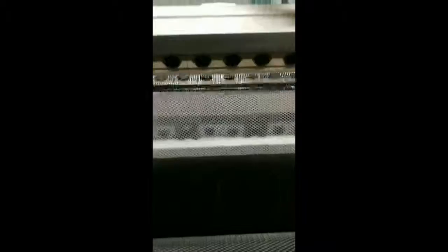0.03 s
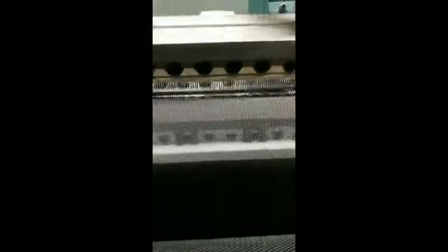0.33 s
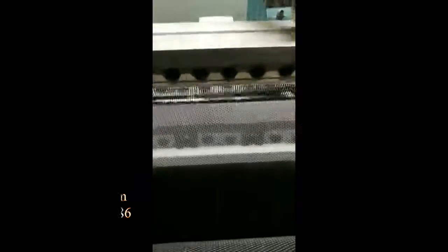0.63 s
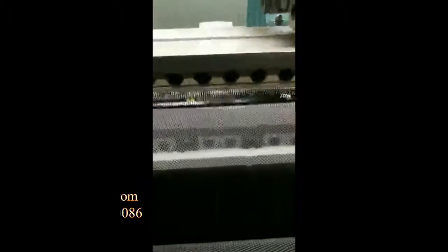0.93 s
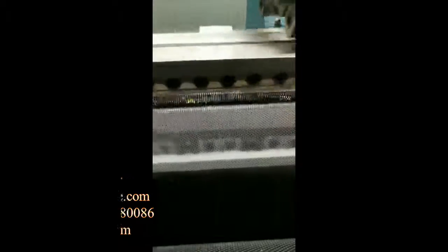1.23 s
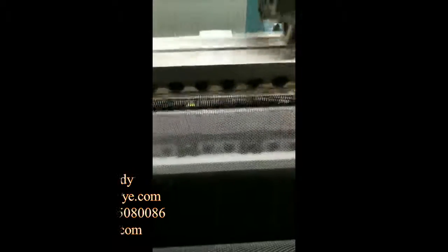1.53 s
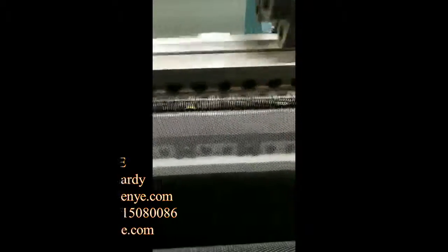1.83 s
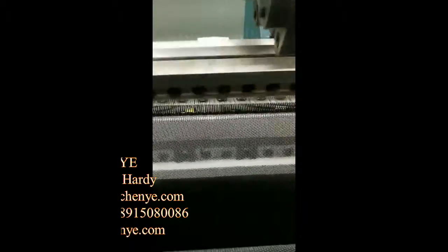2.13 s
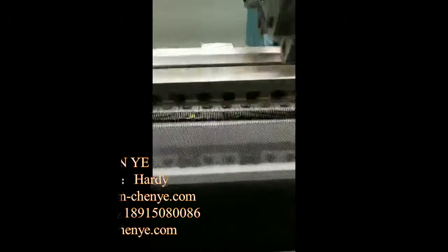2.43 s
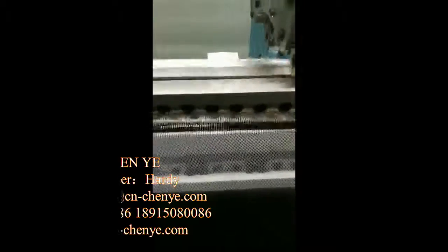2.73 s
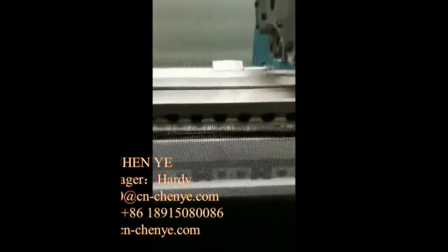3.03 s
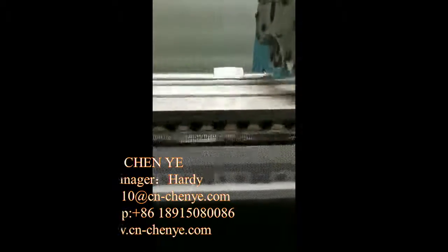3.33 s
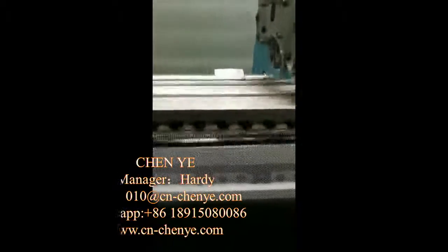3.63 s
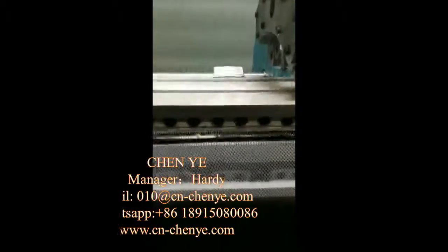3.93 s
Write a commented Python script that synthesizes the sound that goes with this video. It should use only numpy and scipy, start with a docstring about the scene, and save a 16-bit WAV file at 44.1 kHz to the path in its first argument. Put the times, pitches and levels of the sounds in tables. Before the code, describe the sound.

A factory knitting machine runs at steady speed close to the microphone. Needles clatter and bars thump in quick, even strokes over a drone and light yarn hiss. A metallic ringing builds early, then the level eases slightly.

```python
"""Factory hall, close up on a warp knitting machine at steady speed; a phone's two microphones.
The sound cuts in at 0.26 s. Each turn of the main shaft repeats the stroke: the swinging bars thump and
knock, needles clatter, yarn hisses through the guides; the frame drones, gears sing, the drive whines.
By 1 s the clang of the needle bars has come up. By 1.8 s the level has eased and the clatter surges
less; the machine runs on to the end."""
import sys
import numpy as np
from scipy import signal
from scipy.fft import rfft, irfft
from scipy.io import wavfile
from scipy.ndimage import map_coordinates

SR = 44100
rng = np.random.default_rng(int(sys.argv[2]) if len(sys.argv) > 2 else 0)


def store_pcm(level_fs):
    """Save levels as 16-bit WAV."""
    pcm = np.round(np.clip(level_fs, -1, 1) * 32767).astype(np.int16)
    wavfile.write(sys.argv[1], SR, np.atleast_2d(pcm).T)


N = 176400

TURN_HZ, GRAIN_HZ = 6.376, 700.4  # main shaft; fine flicker of clatter and hiss


def undb(db):
    return 10 ** (np.asarray(db) / 20)


def across(table, hz):
    """Read a (Hz, value) table on a log-frequency axis."""
    f, v = np.array(table, float).T
    return np.interp(np.log(np.maximum(hz, 1)), np.log(f), v)


def colour(x, gain):
    """Filter by a gain given as a function of frequency."""
    return irfft(rfft(x) * gain(np.fft.rfftfreq(N, 1 / SR)), N)


def shaped(x, spectrum, db):
    """Give a sound a spectrum and an rms level."""
    y = colour(x, lambda f: undb(across(spectrum, f)))
    return y * undb(db) / np.std(y)


def walk(rate):
    """Smooth chance with a spread near 1."""
    points = rng.standard_normal(int(N / SR * rate) + 4)
    return map_coordinates(points, [np.arange(N) / SR * rate], order=2, mode="mirror")


def over_time(t, table):
    return np.interp(t, *np.array(table).T)


def each_turn(t, table):
    """Gain that follows the same (ms, dB) course in every turn."""
    ms, db = np.array(table, float).T
    return undb(np.interp(t, ms / 1000, db, period=1 / TURN_HZ))


def rattle(repeat):
    """Dense contacts: a share recurs alike in every turn, the rest is new."""
    size = round(SR / TURN_HZ)
    turn = irfft(np.exp(2j * np.pi * rng.random(size // 2 + 1)), size)
    recurring = np.resize(turn / turn.std(), N)
    return np.sqrt(repeat) * recurring + np.sqrt(1 - repeat) * rng.standard_normal(N)


def shaft_tones(t, table):
    """Steady tones on whole multiples of the shaft rate."""
    return sum(np.sqrt(2) * undb(db) * np.sin(2 * np.pi * (order * TURN_HZ * t + rng.random()))
               for order, db in table)


def reflected(t, x, t60_s=.11, db=-5.5):
    """Add short, dense reflections off the machine's steel sides."""
    tail = rng.standard_normal(N) * np.exp(-np.log(1000) * t / t60_s)
    return x + undb(db) * signal.fftconvolve(x, tail / np.linalg.norm(tail))[:N]


def ringing(x, modes, db, top_hz=5800):
    """Steel ringing on its modes, at an rms level."""
    def response(f):
        peaks = sum(undb(gain) * width / (1j * width + 2 * (hz - f)) for hz, width, gain in modes)
        return peaks / (1 + (f / top_hz) ** 8)
    y = colour(x, response)
    return y * undb(db) / y.std()


def stroke(t, ms, jitter_s=.000097, scatter_db=.87):
    """Time from the nearest blow of a kind (s) and its strength; both vary from turn to turn."""
    since = t - ms / 1000 + 1 / TURN_HZ
    turn = np.maximum(np.round(since * TURN_HZ), 0).astype(int)
    size, shift = rng.standard_normal((turn[-1] + 1, 2)).T
    return since - turn / TURN_HZ + jitter_s * shift[turn], undb(scatter_db * size)[turn]


# Motor drive, faint behind the machine: tones (f/Hz, level/dB) and their course (t/s, level/dB)
WHINE_TONES = [(11649, -77), (11946, -70), (11999, -74), (12059, -70), (12295, -72)]
WHINE_COURSE = [(.26, 5), (.55, 5), (.9, 0), (1.25, -3), (1.6, 2.5), (2.9, .5), (3.25, 4.5), (4, 2.5)]
def whine(t, waver_db=2.5):
    """The drive's switching tone and its sidebands, each wavering."""
    tones = sum(undb(db + waver_db * walk(2.85)) * np.sin(2 * np.pi * hz * t + .5 * walk(12))
                for hz, db in WHINE_TONES)
    return tones * undb(over_time(t, WHINE_COURSE))


# Gear tones (f/shaft rate, level/dB)
GEAR_ORDERS = [(100, -51), (146, -53.8), (162, -53.2), (166, -51.4), (167, -53.9), (184, -47.5),
               (240, -54.9), (241, -55.5), (255, -54.9), (259, -55.6), (266, -55.7), (271, -55.9)]
def gears(t):
    """The gears sing on high shaft orders."""
    return shaft_tones(t, GEAR_ORDERS)


# Drone of the frame (f/shaft rate, level/dB)
FRAME_ORDERS = [(10, -55), (11, -57), (14, -55), (15, -56), (16, -46.5), (19, -58), (24, -53), (26, -53),
                (33, -50), (34, -47), (43, -44), (52, -53), (56, -51), (58, -51)]
def frame_drone(t):
    """The frame drones on low shaft orders."""
    return shaft_tones(t, FRAME_ORDERS)


# Yarn hiss: spectrum (f/Hz, level/dB) and course in the turn (t/ms, level/dB)
YARN_SPECTRUM = [(1500, 0), (3500, -0.5), (5000, 2), (6200, -1), (8500, -1), (10800, -5), (13300, -3),
                 (15800, -15.5)]
YARN_IN_TURN = [(0, -4), (15, -4.5), (40, -7.5), (58, -4.5), (63, 2.5), (85, 2), (105, 0.5), (125, -2),
                (141, -8), (145, 4.5), (150, -3)]
def yarn(t, grain_db=.7):
    """Yarn hisses as each stroke draws it through the guides."""
    friction = rng.standard_normal(N) * each_turn(t, YARN_IN_TURN) * undb(grain_db * walk(GRAIN_HZ))
    return shaped(reflected(t, friction), YARN_SPECTRUM, db=-46)


# Needle bars: modes (f/Hz, width/Hz, level/dB), drive in the turn (t/ms, level/dB),
# course (t/s, level/dB)
CLANG_MODES = [(1550, 24, -2), (1625, 54, 1), (1693, 23, 1.5), (1766, 30, -2.5), (1893, 34, -3.5),
               (2940, 40, -5.5), (3014, 42, -5.5)]
CLANG_IN_TURN = [(0, -2), (12, 5), (24, 0.5), (34, -6), (45, 2.5), (54, -7), (95, -7), (112, 0.5),
                 (123, -7), (132, 7), (143, -5.5), (152, 1.5)]
CLANG_COURSE = [(.26, -10), (1, -0.5), (1.6, -0.5), (2.3, -0.5), (3.1, 0.5), (4, 0.5)]
def bar_clang(t):
    """Contacts set the needle bars ringing several times a turn."""
    contacts = rattle(repeat=.55) * each_turn(t, CLANG_IN_TURN)
    return ringing(contacts, CLANG_MODES, db=-38.3) * undb(over_time(t, CLANG_COURSE))


# Bar rumble: spectrum (f/Hz, level/dB) and course in the turn (t/ms, level/dB)
RUMBLE_SPECTRUM = [(25, -48), (60, -11), (120, -9.5), (160, -3), (215, -1), (285, -5), (365, -1),
                   (450, -4.5), (650, -6), (850, -11), (1200, -18), (2500, -45)]
RUMBLE_IN_TURN = [(0, 1), (25, 1), (42, 0), (52, 2), (75, 3.5), (86, -5), (105, 1), (130, -7.5), (150, 1.5)]
def bar_rumble(t):
    """The bars rumble as they swing."""
    return shaped(rattle(repeat=.5) * each_turn(t, RUMBLE_IN_TURN), RUMBLE_SPECTRUM, db=-36)


# Needle clatter: spectrum (f/Hz, level/dB), surge in the turn (t/ms, level/dB),
# depth of the surge (t/s, factor on its dB swing)
CLATTER_SPECTRUM = [(300, -9.5), (600, -8), (850, -5), (1060, -4.5), (1200, -1), (1380, -4.5), (1650, -3.5),
                    (1900, -3.5), (2250, -4), (2600, -4.5), (2950, -6), (3200, -11.5), (3550, -10.5),
                    (3850, -14.5), (5100, -18), (5900, -25), (9000, -39), (16000, -46)]
SURGE_IN_TURN = [(0, 0.06), (16, 1.34), (30, 0.93), (47, -0.51), (60, -2.3), (80, -1), (95, -0.45),
                 (122, 0.36), (140, -0.64)]
SURGE_DEPTH = [(.26, 1.7), (1.3, 1.5), (1.8, 1), (4, 1)]
# Modes of the guides and steel plates (f/Hz, width/Hz, level/dB)
PLATE_MODES = [(1068, 14.5, 1.5), (1175, 7.9, -0.5), (1460, 10, -4), (2760, 12, -4), (2937, 26, -3.5),
               (3507, 60, -11.5), (5100, 51, -14)]
def needle_clatter(t, grain, grain_db=1.5):
    """Needles and sinkers clatter in surges; guides and plates ring thinly with them."""
    surge = each_turn(t, SURGE_IN_TURN) ** over_time(t, SURGE_DEPTH)
    contacts = rattle(repeat=.4) * surge * undb(grain_db * grain)
    needles = shaped(reflected(t, contacts), CLATTER_SPECTRUM, db=-34)
    return needles + ringing(contacts * surge, PLATE_MODES, db=-44.5)


# Needle clacks in each turn (t/ms, f/Hz, level/dB)
NEEDLE_CLACKS = [(10.8, 1560, -39.5), (14.5, 2640, -34), (16.9, 1130, -34.5), (24.9, 1200, -37.5),
                 (39.8, 1100, -36), (38.3, 2540, -34.5), (42.9, 1400, -35.5), (44.4, 1280, -37.5),
                 (47.5, 2480, -39), (51.2, 1950, -34), (59.5, 2640, -41), (68.5, 2600, -38.5),
                 (94.5, 960, -31.5), (112.5, 1080, -44), (130.8, 1740, -42.5), (134.2, 1800, -36),
                 (153.1, 1600, -39.5), (152, 3000, -41.5)]
def clacks(t, swell_s=.0015, width_hz=450):
    """Rows of needles and sinkers meet: short, unpitched bursts of contacts."""
    out, contacts = np.zeros(N), rattle(repeat=.39)
    for ms, hz, db in NEEDLE_CLACKS:
        age, size = stroke(t, ms)
        rise = np.maximum(age, 0) / swell_s
        burst = colour(contacts, lambda f: np.exp(-((f - hz) / width_hz) ** 2))
        out += undb(db) * size * rise * np.exp(1 - rise) * burst / burst.std()
    return out


def thud(t, ms, hz, db, half_ms):
    """A heavily damped blow in every turn."""
    age, size = stroke(t, ms)
    return -undb(db) * size * np.exp(-(age * 1000 / half_ms) ** 2) * np.cos(2 * np.pi * hz * age)


# Bar thumps in each turn, close to the microphones (t/ms, f/Hz, level/dB)
BAR_THUMPS = [(7.15, 284, -31), (15.92, 323, -32), (25.08, 255, -28), (37, 315, -31), (42.74, 344, -32),
              (54.6, 235, -30), (62.24, 337, -32.5), (73.5, 253, -29), (84.74, 307, -28.5),
              (105.6, 243, -29), (145.8, 207, -30), (152.5, 252, -26)]
def bars(t):
    """The swinging bars thump along the stroke and land with one firm knock."""
    thumps = sum(thud(t, ms, hz, db, half_ms=4.14) for ms, hz, db in BAR_THUMPS)
    return thumps + thud(t, ms=31.6, hz=575, db=-20, half_ms=1.9)


# Microphone pair: left over right (f/Hz, level/dB) and likeness (f/Hz, coherence 0-1)
MIC_SHADOW = [(60, 0), (200, 0.6), (370, 1.9), (500, 6.1), (700, 7.2), (1290, 6.8), (2380, 8.47),
              (4400, 11.5), (6000, 18), (8120, 22), (12000, 29), (15000, 30)]
MIC_LIKENESS = [(60, 1), (130, 0.98), (290, 0.78), (450, 1), (700, 0.36), (1200, 0.088), (3000, 0.1),
                (16000, 0.0975)]
def microphones(shared, near, far, lag_s=.000574):
    """The bass reaches both alike; the right one hears later and is turned away from the treble."""
    def likeness(f):
        return across(MIC_LIKENESS, f)
    def ports(f):
        shade = undb(-across(MIC_SHADOW, f))
        gains = np.array([np.ones_like(f), shade * np.exp(-2j * np.pi * f * lag_s)])
        return gains * 2 / np.sqrt(1 + shade ** 2 + 2 * shade * likeness(f))
    right = colour(near, likeness) + colour(far, lambda f: np.sqrt(1 - likeness(f) ** 2))
    return colour(np.array([near, right]) + shared, ports)


# Loudness at the microphones (t/s, bass level/dB, upper level/dB)
LOUDNESS_COURSE = [(.26, 4, 4), (.8, 3.5, 2.5), (1.15, 3.5, 0.4), (1.4, 3, -0.4), (1.62, 0.5, 0.6),
                   (2.2, 0.5, 0.3), (3.1, -0.1, 0.5), (4, 0, 0.2)]
def scene():
    """The machine from close up, along two paths through the hall."""
    t = np.arange(N) / SR
    grain = np.resize(walk(GRAIN_HZ)[:round(SR / TURN_HZ)], N)  # alike in every turn
    shared = frame_drone(t) + bars(t)
    near, far = (bar_rumble(t) + needle_clatter(t, grain) + bar_clang(t) + yarn(t)
                 + clacks(t) + gears(t) + whine(t) for _ in range(2))
    pair = microphones(shared, near, far)
    bass = colour(pair, lambda f: 1 / (1 + (f / 600) ** 2))
    times, bass_db, upper_db = np.array(LOUDNESS_COURSE).T
    return bass * undb(np.interp(t, times, bass_db)) + (pair - bass) * undb(np.interp(t, times, upper_db))


def record(dry):
    """The phone cuts in abruptly and loses the highest treble."""
    start_s, top_hz = .2628, 15800
    on = np.arange(N) / SR >= start_s
    return signal.sosfilt(signal.ellip(10, .2, 80, top_hz, fs=SR, output="sos"), dry * on)


dry = scene()
out = record(dry)
store_pcm(out)
```